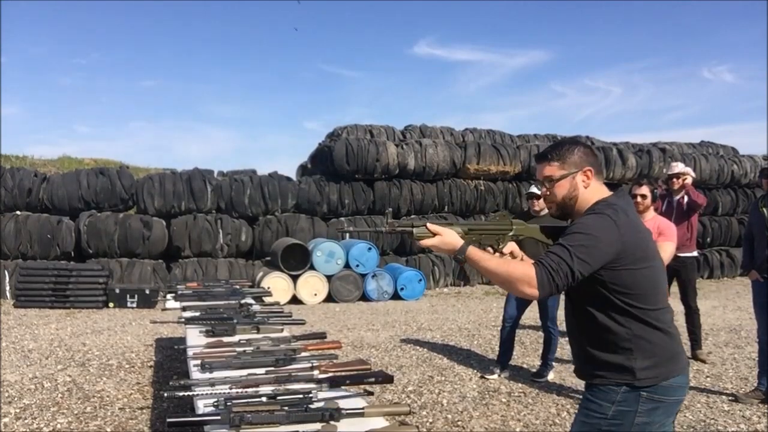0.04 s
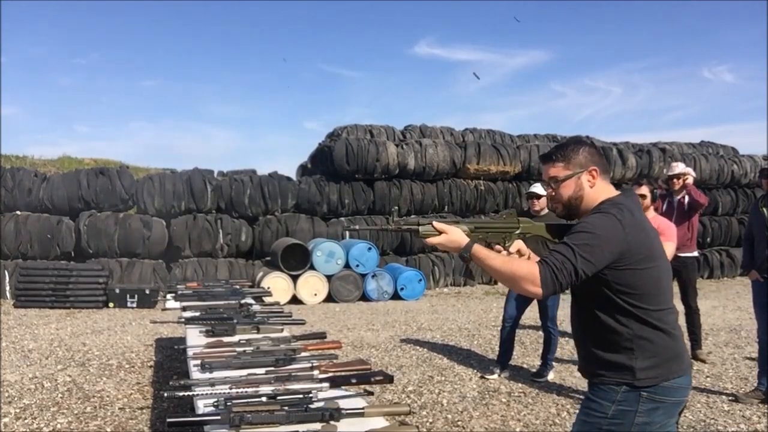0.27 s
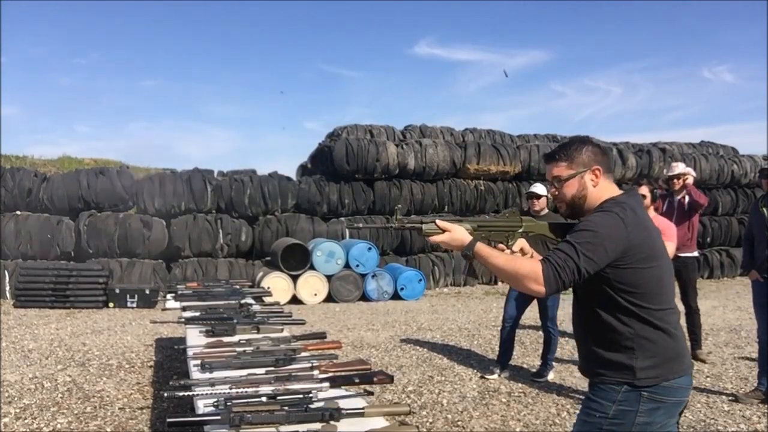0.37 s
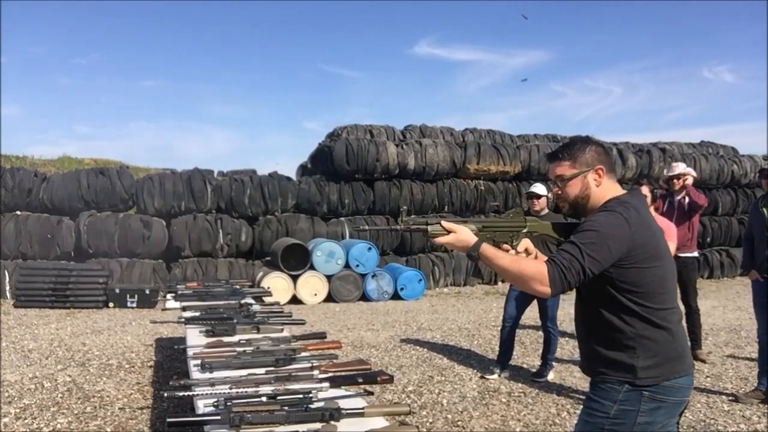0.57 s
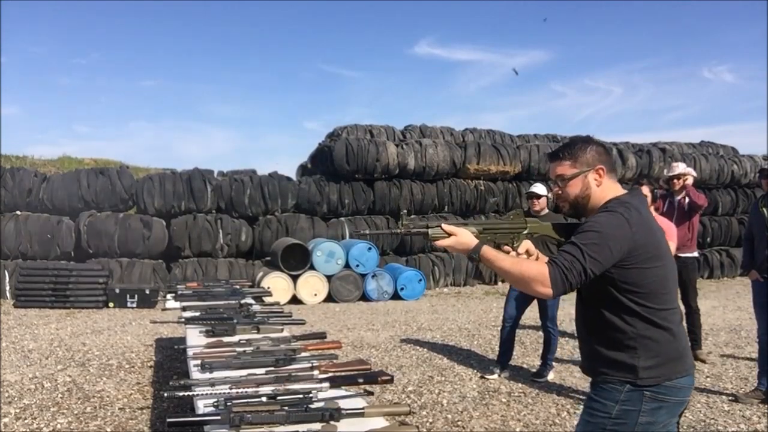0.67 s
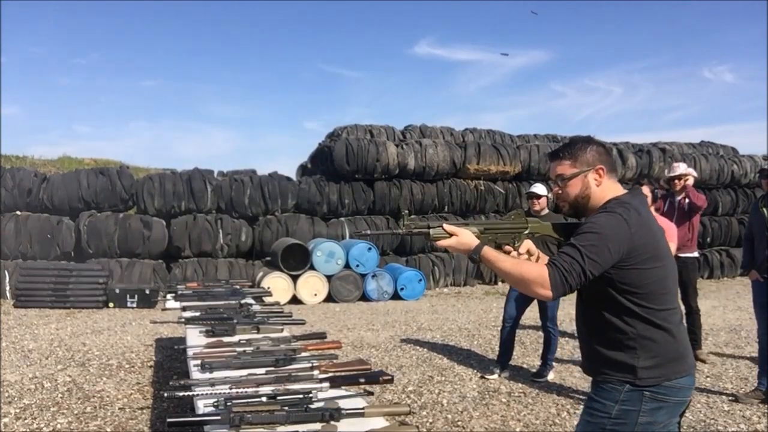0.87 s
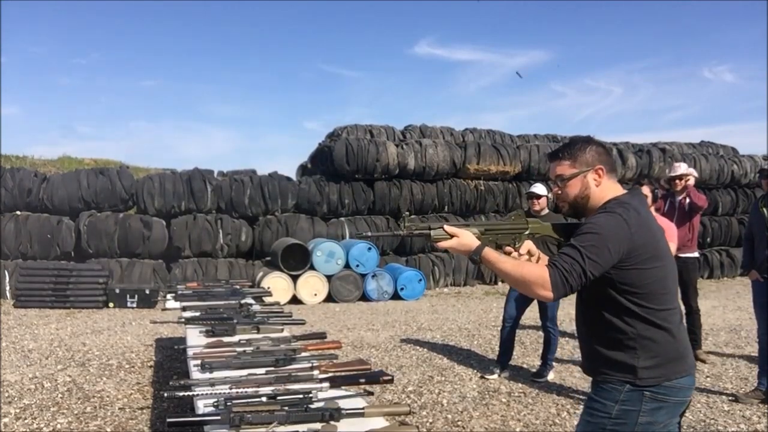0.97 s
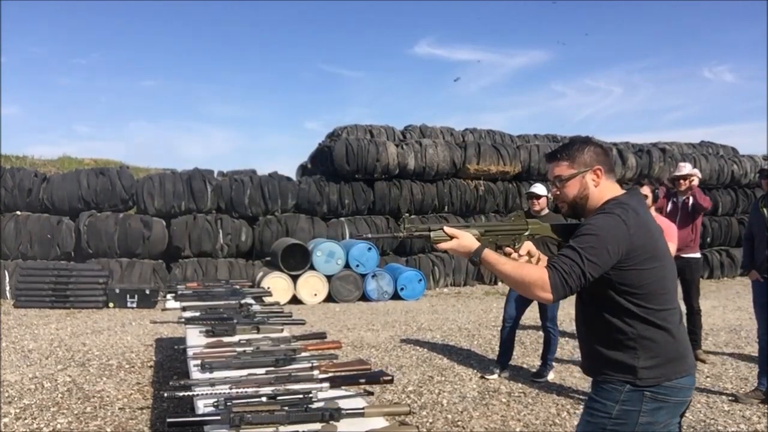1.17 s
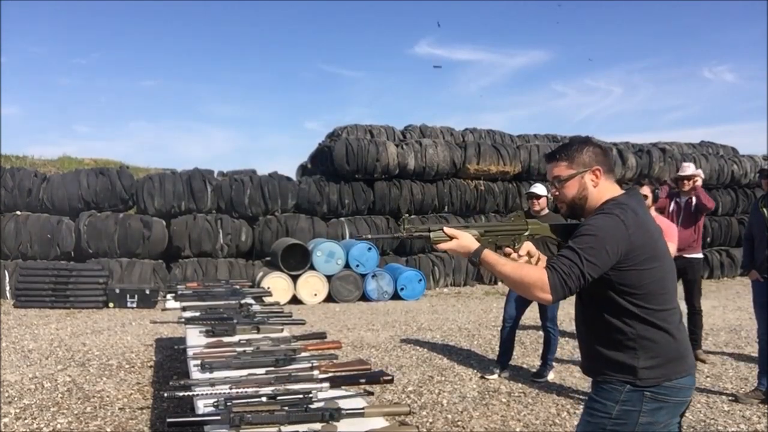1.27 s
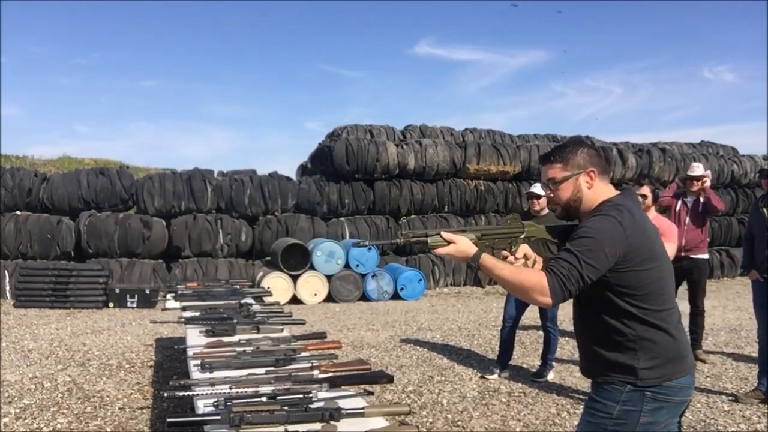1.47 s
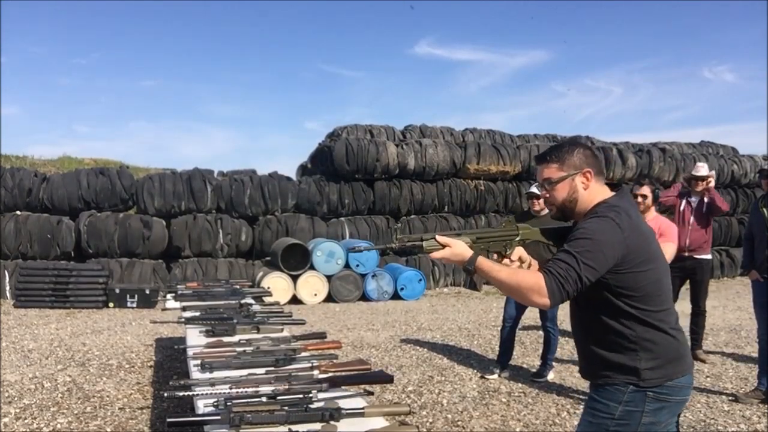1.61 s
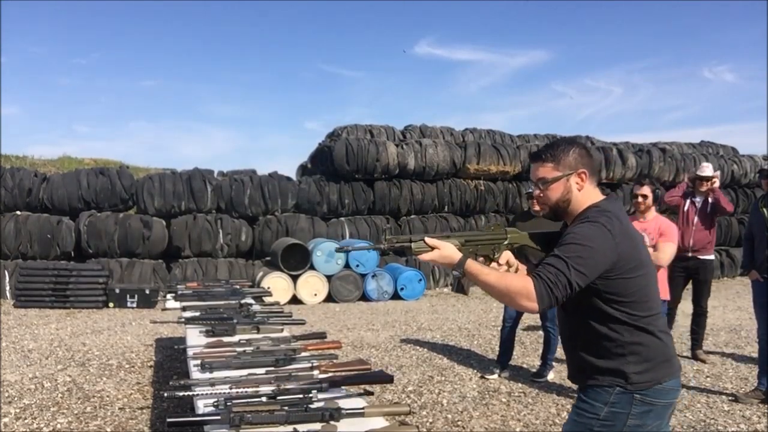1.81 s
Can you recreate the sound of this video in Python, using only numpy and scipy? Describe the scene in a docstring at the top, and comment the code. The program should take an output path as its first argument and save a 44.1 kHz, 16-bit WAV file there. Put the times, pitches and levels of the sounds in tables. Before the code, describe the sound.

One fast, even burst of automatic rifle fire distorts a nearby microphone, with metallic bolt clatter and short, dull echoes from stacked tyres. The shots die away in the open air, leaving a light handling clack and rustle.

```python
"""Rifle burst on a gravel range

An automatic rifle fires thirteen rounds close to a small microphone. Each blast overloads it and
comes back, dull, from walls of stacked tyres. The bolt slams shut between rounds and the steel
rings on. After the burst the rifle clacks and rustles as it is handled."""
import sys
import numpy as np
from scipy import signal
from scipy.fft import rfft, irfft
from scipy.io import wavfile
from scipy.ndimage import uniform_filter1d

SR = 44100
rng = np.random.default_rng(int(sys.argv[2]) if len(sys.argv) > 2 else 0)


def master(y):
    """Save y as 16-bit WAV."""
    cut = np.clip(np.atleast_2d(y).T, -1, 1)
    pcm = np.round(cut * 32767)  # scale
    wavfile.write(sys.argv[1], SR, pcm.astype(np.int16))


N = 81585
EVENT_SAMPLES = 2 ** 15


def amp(db):
    """Decibels to gain."""
    return 10 ** (np.asarray(db) / 20)


def unit(x):
    """Scale to rms 1."""
    return x / np.sqrt(np.mean(x ** 2) + 1e-20)


def lookup(points, hz, column=1):
    """Interpolate a table column over log frequency."""
    table = np.array(points)
    return np.interp(np.log(hz + 1), np.log(table[:, 0]), table[:, column])


def add(mix, start_s, sound):
    """Mix a sound in at start_s."""
    part = mix[round(start_s * SR):][:len(sound)]
    part += sound[:len(part)]


def noise(spectrum, size=EVENT_SAMPLES):
    """Shaped noise, rms 1."""
    gain = amp(lookup(spectrum, np.fft.rfftfreq(size, 1 / SR)))
    return unit(irfft(rfft(rng.standard_normal(size)) * gain, size))


def even_noise_spectrum():
    """Spectrum of white noise with its energy evened out over time and frequency."""
    x = rng.standard_normal(EVENT_SAMPLES)
    for size in (2048, 256, 1024, 512) * 2:
        frames = signal.stft(x, nperseg=size)[2]
        x = signal.istft(frames / (abs(frames) + 1e-12), nperseg=size)[1][:EVENT_SAMPLES]
    return rfft(unit(x))


def envelope(rise_s, t60_s, hold_s=0, delay_s=0):
    """Linear rise, hold, exponential decay."""
    t = np.arange(EVENT_SAMPLES) / SR - delay_s
    decay = np.exp(-np.log(1000) * np.maximum(t - rise_s - hold_s, 0) / t60_s)
    return np.clip(t / rise_s, 0, 1) * decay


def pulse(delay_s, hz, half_s):
    """Pressure wave of a few cycles in a Gaussian window."""
    t = np.arange(EVENT_SAMPLES) / SR - delay_s
    return np.exp(-(t / half_s) ** 2) * np.cos(2 * np.pi * hz * t)


# Background spectrum: f/Hz, level/dB
AIR_SPECTRUM = [(20, -30.5), (50, -14.5), (100, 0), (350, -1), (750, -9.5), (1500, -11), (4400, -22),
                (8500, -39), (15000, -55.5)]
# Background contour: t/s, level/dB
AIR_CONTOUR = [(0, -55.5), (0.111, -65), (1.6, -45), (1.73, -54), (1.85, -64)]


def air():
    """Faint outdoor background."""
    level_db = np.interp(np.arange(N) / SR, *np.transpose(AIR_CONTOUR))
    return noise(AIR_SPECTRUM, size=N) * amp(level_db)


# Clicks (rows 1-4), growing louder into the first shot; handling clacks (5-7): t/s, level/dB, T60/s
TRANSIENTS = [(0.125, -59.5, 0.027), (.181, -38, 0.087), (0.1917, -26, .08), (0.1992, -17.5, 0.072),
              (1.758, -23, 0.015), (1.782, -40, 0.038), (1.825, -38.5, 0.055)]
# Transient spectrum: f/Hz, level/dB
TRANSIENT_SPECTRUM = [(30, -26), (120, -8.5), (300, 0), (650, 0.5), (950, -6), (1350, -3), (2100, -14),
                      (2950, -2), (3900, -20), (5100, -15), (6000, -21), (7100, -16), (9000, -31),
                      (16000, -42)]
# Rustle spectrum: f/Hz, level/dB
RUSTLE_SPECTRUM = [(30, -28), (100, 0), (300, 7), (700, 5), (2000, -7), (4200, -7), (7000, -17),
                   (10000, -39), (16000, -44)]


def lead_in_and_handling():
    """Clicks that grow louder into the first shot; later the handled rifle clacks, rustles."""
    out = np.zeros(N)
    for start_s, db, t60_s in TRANSIENTS:
        add(out, start_s, amp(db) * noise(TRANSIENT_SPECTRUM) * envelope(rise_s=0.001, t60_s=t60_s))
    rustle = amp(-41.5) * noise(RUSTLE_SPECTRUM) * envelope(rise_s=0.007, t60_s=0.9)
    add(out, start_s=1.76, sound=rustle)
    return out


# Shot spectra: f/Hz, blast/dB, tyre scatter/dB, tail/dB
SHOT_SPECTRA = [(25, -30, -33.5, -34.5), (58.6, -9, -14.5, -10), (136, -4, -5, -3), (350, -4, 6, 7.5),
                (740, -4, -1.5, -5.5), (1450, 1.5, -2, -11), (2680, -7, -8, -7.5), (5600, -6.5, -14, -26.5),
                (9500, -14.5, -26, -25), (16000, -16.5, -35.5, -30.5)]
# Blast decay: f/Hz, T60/s
BLAST_DECAY = [(60, .2), (400, 0.12), (1500, 0.081), (5000, .066), (14000, 0.062)]
# Scattering surfaces: delay/s, level/dB
WALLS = [(0.0137, 1.5), (0.0408, -1), (0.0598, 1.5), (0.131, -16)]


def range_response(centres_hz, band_shares):
    """Power per band over time: blast with near tail and duller far tail; wall scatter."""
    powers = (amp(lookup(SHOT_SPECTRA, centres_hz, column)) ** 2 for column in (1, 2, 3))
    blast_bands, scatter_bands, tail_bands = (p[:, None] / (p @ band_shares) for p in powers)
    blast_t60_s = lookup(BLAST_DECAY, centres_hz)[:, None]
    blast = (amp(-5.5) * envelope(rise_s=1 / SR, t60_s=blast_t60_s, hold_s=0.013)) ** 2
    scatter = sum((amp(db - 13) * envelope(rise_s=0.0017, t60_s=0.12, delay_s=delay_s)) ** 2
                  for delay_s, db in WALLS)
    near = (amp(-23.5) * envelope(rise_s=0.05, t60_s=0.34)) ** 2
    far = (amp(-42) * envelope(rise_s=0.05, t60_s=0.86)) ** 2
    far_lowpass = 1 / (1 + (centres_hz[:, None] / 2500) ** 4)
    return blast_bands * blast + tail_bands * (near + far * far_lowpass), scatter_bands * scatter


# Rounds: t/s, blast/dB, echoes/dB, thump/dB
ROUNDS = [(0.2037, 2.5, 1, 9.5), (0.3034, -0.5, -0.5, -18), (.399, -0.5, 0, -12), (0.4984, -1, 1.5, -1),
          (0.5953, -0.5, 1.5, -10), (0.6922, 0, 1, -13), (0.7879, 0.5, 1.5, -18), (0.8842, 1, 0.5, 1),
          (0.9797, 1, 1, 3), (1.0785, 0, 1.5, 10), (1.1765, 0, 1, 4), (1.2787, 0, 1, -7),
          (1.378, 0, 0.5, 5)]
# Noise common to all rounds: f/Hz, power share
COMMON_SHARE = [(40, 0.74), (300, 0.89), (1500, 0.62), (3500, 0.52), (8000, 0.2), (16000, 0.24)]
# Peaks reinforced by reflections: f/Hz
PEAKS_HZ = [131, 167, 295, 358, 394, 451, 496, 645, 786, 1007, 1057, 1238, 1322, 1492, 1660, 2166]
# Boost per peak: level/dB
PEAKS_DB = [3, 1.6, 1, 4, 1.7, 2.9, 4.45, 5.6, 2.5, 4, 3.4, 4.3, 4, 2.4, 5, 5.7]
PEAK_WIDTH_HZ = 29


def shots():
    """Each round excites nearly the same dense reflections, with a low thump of muzzle gas."""
    hz = np.fft.rfftfreq(EVENT_SAMPLES, 1 / SR)
    centres_hz = np.geomspace(25, 16000, 22)
    bands = np.array([np.interp(hz, centres_hz, row) for row in np.eye(len(centres_hz))])
    blast_power, scatter_power = range_response(centres_hz, bands.mean(1))
    thump = amp(-31) * pulse(delay_s=0.0221, hz=55, half_s=0.014)
    boost_db = sum(db * np.exp(-((hz - peak_hz) / PEAK_WIDTH_HZ) ** 2)
                   for peak_hz, db in zip(PEAKS_HZ, PEAKS_DB))
    share = lookup(COMMON_SHARE, hz)
    common = np.sqrt(share) * even_noise_spectrum()
    out = np.zeros(N)
    for start_s, blast_db, echo_db, thump_db in ROUNDS:
        fresh = np.sqrt(1 - share) * rfft(rng.standard_normal(EVENT_SAMPLES))
        band_noise = irfft(bands * amp(boost_db) * (common + fresh))
        band_gains = np.sqrt(amp(blast_db) ** 2 * blast_power + amp(echo_db) ** 2 * scatter_power)
        report = (band_noise * band_gains).sum(0)
        add(out, start_s, report + amp(echo_db) * echoes() + amp(thump_db) * thump)
    return out


# Distinct echoes: delay/s, f/Hz, half length/s, level/dB
ECHOES = [(0.013, 598, 0.0016, -6.5), (.045, 344, 0.0021, -4), (.0478, 672, 0.0015, -6),
          (.0458, 1600, 0.00089, -11.5), (0.057, 779, .0014, -14.5), (.06, 330, .0022, -10.5),
          (0.0604, 1150, 0.00075, -4), (.066, 450, .0024, -10), (.0703, 840, 0.0018, -8),
          (0.077, 650, 0.0012, -14)]
ECHO_SPREAD_DB, ECHO_PITCH_SPREAD = 1.0, 0.04


def echoes():
    """Tyre stacks and nearby objects return short, dull thuds, slightly different each round."""
    out = np.zeros(EVENT_SAMPLES)
    for delay_s, hz, half_s, db in ECHOES:
        gain = amp(rng.normal(db, ECHO_SPREAD_DB))
        out += gain * pulse(delay_s, hz * rng.normal(1, ECHO_PITCH_SPREAD), half_s)
    return out


# Steel modes: f/Hz
STEEL_HZ = [2960, 7698, 9986]
# Ring per mode: level/dB, T60/s
STEEL_DECAY = [(-51, .5), (-41, 0.098), (-40.5, 0.26)]
KNOCK_RISE_S = 0.0014


def steel_ring():
    """Thin ring of the rifle's steel after a knock."""
    t = np.arange(EVENT_SAMPLES) / SR
    return sum(amp(db) * envelope(KNOCK_RISE_S, t60_s) * np.sin(2 * np.pi * (hz * t + rng.random()))
               for hz, (db, t60_s) in zip(STEEL_HZ, STEEL_DECAY))


# Bolt slam spectrum: f/Hz, level/dB
BOLT_SPECTRUM = [(200, -13.5), (1000, 2.5), (1900, -11.5), (3400, -8.5), (4300, 2.5), (5000, -1.5),
                 (6300, -7.5), (9000, -16.5), (16000, -15)]
BOLT_LEAD_S, BOLT_DB = 0.0069, -12
LAST_BOLT_S, LAST_BOLT_DB = 1.468, -10
RECOIL_DELAY_S, RECOIL_RING_DB = 0.02, 5.5


def bolt():
    """Thrown back by each round, the bolt slams shut before the next and once more at the end."""
    out = np.zeros(N)
    closings = [(shot_s - BOLT_LEAD_S, BOLT_DB) for shot_s, *_ in ROUNDS[1:]]
    for start_s, db in closings + [(LAST_BOLT_S, LAST_BOLT_DB)]:
        slam = amp(db) * noise(BOLT_SPECTRUM) * envelope(KNOCK_RISE_S, t60_s=0.012, hold_s=0.0011)
        add(out, start_s, slam + steel_ring())
    for shot_s, *_ in ROUNDS:
        add(out, shot_s + RECOIL_DELAY_S, amp(RECOIL_RING_DB) * steel_ring())
    return out


def scene():
    """Rifle, range and background, mono."""
    return (shots() + bolt() + lead_in_and_handling() + air())[None]


LOUD_DB, DUCK_DB_PER_S, OUTPUT_DB = -31.5, 7, 0.5
CUTOFF_HZ = 15800


def record(dry):
    """Microphone overload, gain control that turns down steadily while it is loud, low-pass."""
    clipped = np.tanh(dry)
    power = uniform_filter1d(clipped[0] ** 2, size=2048)
    loud_s = np.cumsum(power / (power + amp(LOUD_DB) ** 2)) / SR
    ducked = clipped * amp(OUTPUT_DB - DUCK_DB_PER_S * loud_s)
    lowpass = signal.firwin(511, CUTOFF_HZ, window=("kaiser", 9), fs=SR)
    return signal.oaconvolve(ducked, lowpass[None], "same")


dry = scene()
out = record(dry)
master(out)
```